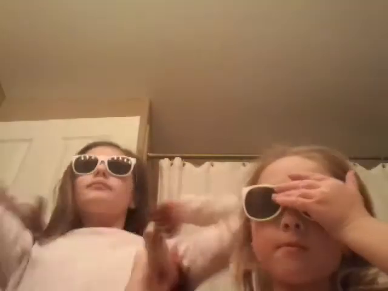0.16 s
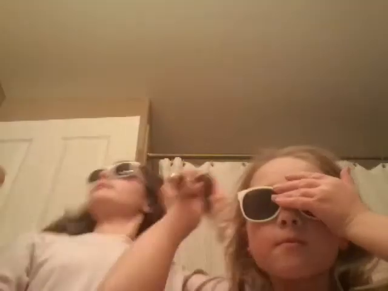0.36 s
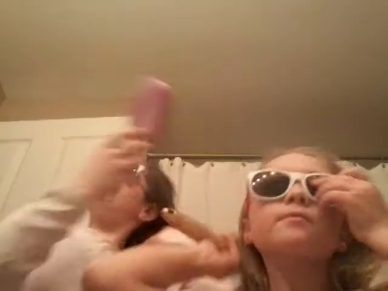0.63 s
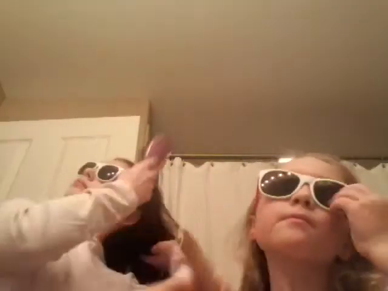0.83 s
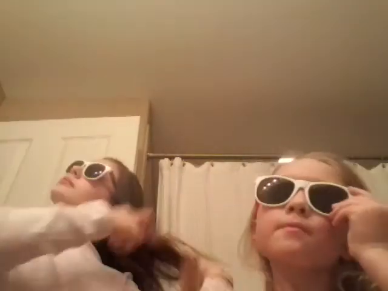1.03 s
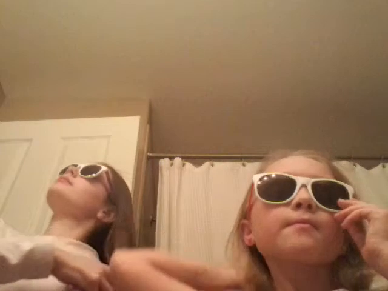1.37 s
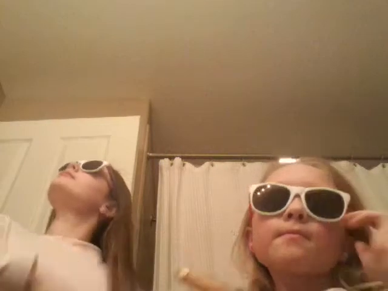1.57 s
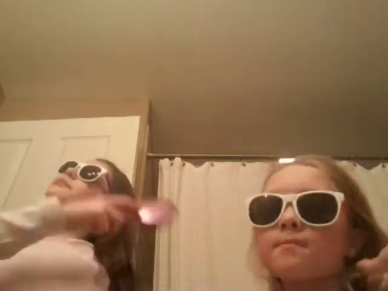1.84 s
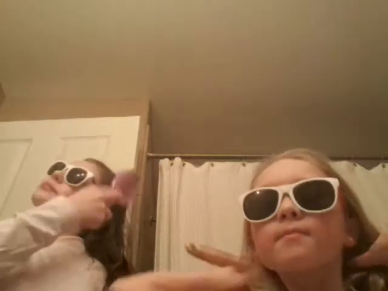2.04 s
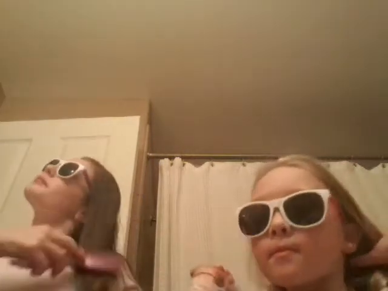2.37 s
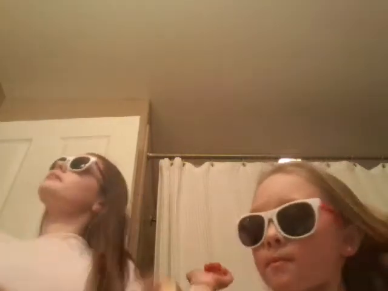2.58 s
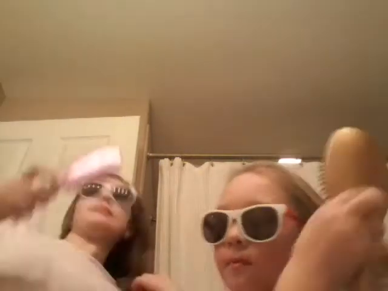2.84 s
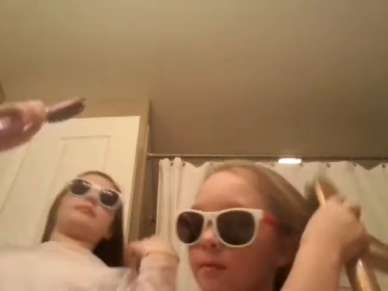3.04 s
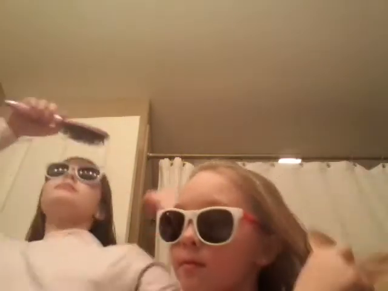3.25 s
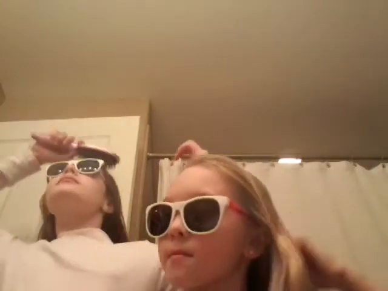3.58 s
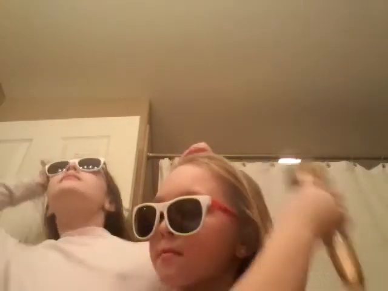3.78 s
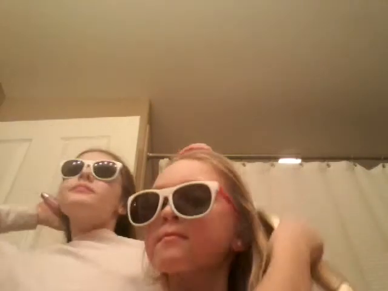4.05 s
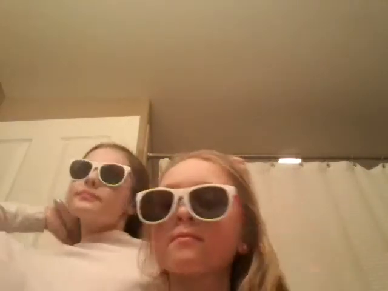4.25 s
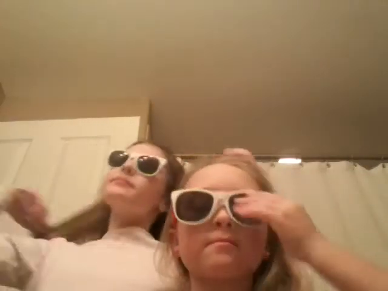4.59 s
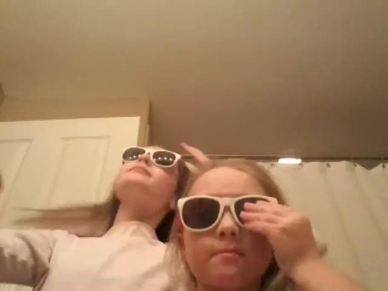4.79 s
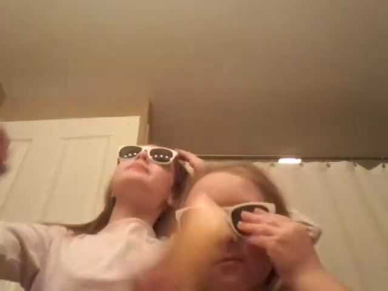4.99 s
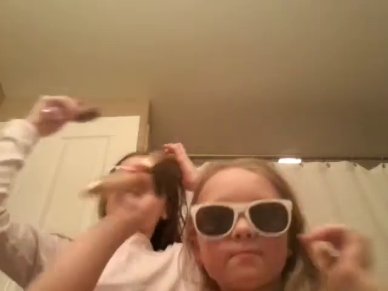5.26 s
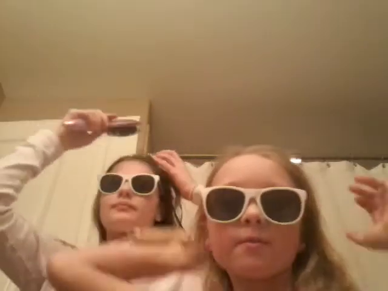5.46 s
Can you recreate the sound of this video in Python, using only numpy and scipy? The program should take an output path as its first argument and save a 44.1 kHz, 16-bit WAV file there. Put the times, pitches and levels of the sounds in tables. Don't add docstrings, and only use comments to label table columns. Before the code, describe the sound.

A small tiled bathroom heard through a little microphone close to the action, with a faint, slightly unsteady extractor fan hum and air noise throughout. At 0 s a dull, low thump shakes the counter and fades in under half a second. Brush strokes follow, hissing through hair from about 0.15 s, with a cluster of strong scratchy catches and plastic ticks at 0.6 to 0.75 s. Sleeves and skin rub, and soft bumps come around 1 s and again at 1.6 s. At 1.76 s the brush snaps on a hard edge: very loud, bright, with quick wall echoes and a short tail. Gentler strokes resume from 2 s, with a snaggy rustle at 2.5 s, then lighter brushing and rubbing from 3.4 to 4.2 s. At 4.32 s a harder, booming thump makes the counter ring and beat. A brief stroke at 4.6 s, then near quiet with faint brushing until about 5.6 s.

```python
import sys
import numpy as np
from scipy import signal
from scipy.fft import rfft, irfft, next_fast_len
from scipy.io import wavfile
from scipy.ndimage import uniform_filter1d

SR = 44100
rng = np.random.default_rng(int(sys.argv[2]) if len(sys.argv) > 2 else 0)


def unload_wav(signal):
    wavfile.write(
        sys.argv[1],
        SR,
        np.round(np.clip(np.atleast_2d(signal).T, -1, 1) * 32767).astype(np.int16),
    )


def convert_level_to_amplitude(level_db):
    exponent = np.asarray(level_db, float) / 20
    return 10 ** exponent


N = 248711
TIME = np.arange(N) / SR
COARSE_TIME = TIME[::32]
EDGES = 25 * 2 ** np.arange(0, 9.9, 1 / 5)
SNAP_S = 1.7633


def rms_one(x):
    return x / np.sqrt(np.mean(x ** 2) + 1e-20)


def peak_one(x):
    return x / np.abs(x).max()


def at_hz(points, hz):
    points = np.array(points)
    return np.interp(np.log(hz), np.log(points[:, 0]), points[:, 1])


def drift(rate):
    r = np.exp(-80 * np.pi * rate / SR)
    white = rng.standard_normal(N // 40 + 2002)
    slow = rms_one(signal.lfilter([1], [1, -2 * r, r * r], white)[2000:])
    return np.interp(np.arange(N) / 40, np.arange(len(slow)), slow)


def coloured(x, spectrum):
    size = next_fast_len(len(x))
    hz = np.maximum(np.fft.rfftfreq(size, 1 / SR), 1)
    return rms_one(irfft(rfft(x, size) * convert_level_to_amplitude(at_hz(spectrum, hz)), size)[:len(x)])


def ring(x, hz, t60):
    r, w = convert_level_to_amplitude(-60 / (max(t60, .001) * SR)), 2 * np.pi * hz / SR
    return signal.lfilter([0, np.sin(w)], [1, -2 * r * np.cos(w), r * r], x + 1e-18)


def grains(per_s, spread_db):
    sizes = convert_level_to_amplitude(spread_db * np.minimum(rng.exponential(1, N), 5)) * rng.choice([-1, 1], N)
    return sizes * (rng.random(N) < per_s / SR)


def place(sound, s):
    at = round(s * SR)
    return np.pad(sound[max(-at, 0):], (max(at, 0), N))[:N]


def swells(start, length, rise_db_per_s, fall_db_per_s):
    early = np.maximum(start[:, None] - COARSE_TIME, 0)
    late = np.maximum(COARSE_TIME - (start + length)[:, None], 0)
    return convert_level_to_amplitude(-2 * np.minimum(rise_db_per_s * early + fall_db_per_s * late, 300))


def gain(shapes, db):
    return np.interp(TIME, COARSE_TIME, np.sqrt(convert_level_to_amplitude(2 * db) @ shapes))


def pitch(shapes, db, hz):
    weight = convert_level_to_amplitude(2 * db)
    return np.interp(TIME, COARSE_TIME, (weight * hz) @ shapes / (weight @ shapes))


def gliding(x, hz, width_hz):
    turn = np.exp(2j * np.pi * np.cumsum(hz) / SR)
    r = np.exp(-np.pi * width_hz / SR)
    smooth = signal.lfilter([1], [1, -2 * r, r * r], x / turn)
    return rms_one((smooth * turn).real)


def dying(white, colour, t60s, hold, low_hz, high_hz):
    t = np.arange(len(white)) / SR
    spectrum, hz = rfft(coloured(white, colour)), np.fft.rfftfreq(len(t), 1 / SR)
    out = np.zeros(len(t))
    for low, high in zip(EDGES, EDGES[1:]):
        inside = (hz >= max(low, low_hz)) & (hz < min(high, high_hz))
        band = irfft(spectrum * inside, len(t))
        out += band * convert_level_to_amplitude(-60 * np.maximum(t - hold, 0) / at_hz(t60s, low))
    return out / np.sqrt(np.mean(out[:round(.05 * SR)] ** 2))


def blow(s, level_db, rise_s, hold_s, shut_s, colour, t60s, low_hz, echoes=(), echo_db=6.0):
    t = np.arange(2 ** 15) / SR
    white = rng.standard_normal(len(t))
    bright = signal.sosfilt(signal.butter(2, 2500, "high", fs=SR, output="sos"), white)
    for delay, db in echoes:
        flare_db = -60 * np.abs(t - delay) / np.where(t < delay, .005, .012)
        white = white + bright * convert_level_to_amplitude(db + echo_db + flare_db)
    tail = dying(white, colour, t60s, hold_s, low_hz, SR / 2)
    gate_db = -10.0 * np.clip((t + s - shut_s) / .08 + 1, 0, 1)
    return place(tail * np.clip(t / rise_s, 0, 1) * convert_level_to_amplitude(level_db + gate_db), s)


def shake(level, colour, t60s, modes, mode_db, in_step=False):
    t = np.arange(2 ** 15) / SR
    out = dying(rng.standard_normal(len(t)), colour, t60s, 0, 30, 700)
    for k, (hz, db, t60) in enumerate(modes):
        start = rng.random()
        if in_step:
            start = k / 2
        out += convert_level_to_amplitude(db + mode_db - 60 * t / t60) * np.sin(2 * np.pi * (hz * t + start))
    out /= np.sqrt(uniform_filter1d(out ** 2, size=1800) + 1e-12)
    s, db = np.transpose(level)
    db = np.interp(t + s[0], s, db) - 300 * np.maximum(t + s[0] - s[-1], 0)
    return place(out * convert_level_to_amplitude(db) * np.clip(t / .0015, 0, 1), s[0] - .0015)


def fan():
    # time in seconds, background level in dB.
    fan_level = [(0, -56.5), (.5, -58), (.8, -59.5), (1.7, -59), (2.2, -60.5), (3.0, -61), (4.3, -61),
                 (4.34, -53), (4.64, -56), (4.8, -62.5), (5.64, -63)]
    # pitch in Hz, level in dB per Hz.
    air_colour = [(20, -8), (45, -16), (80, -9), (130, -7), (200, -10), (330, -13.5), (480, -9.5),
                  (600, -11), (800, -12), (1000, -15), (2300, -16.5), (3600, -15.5), (6000, -16.5),
                  (8500, -21.5), (15400, -23)]
    # pitch in Hz, level in dB over the background.
    hum_tones = [
        (120, -7.5),
        (240, -24),
    ]
    sound = coloured(rng.standard_normal(N), air_colour) * convert_level_to_amplitude(-3)
    for hz, db in hum_tones:
        strength = convert_level_to_amplitude(db + 2.5 * drift(9)) * np.sqrt(2)
        sound += strength * np.sin(2 * np.pi * hz * TIME + .45 * drift(8))
    return sound * convert_level_to_amplitude(np.interp(TIME, *np.transpose(fan_level)))


def first_thump():
    # pitch in Hz, level in dB per Hz.
    colour = [(24, -66), (40, -40), (85, -33), (105, -10), (123, -3), (174, -17), (230, -9), (290, -6),
              (390, -7), (560, -13), (700, -28), (2910, -44), (5800, -35.5), (8500, -54), (15400, -70)]
    # pitch in Hz, seconds to fall 60 dB.
    t60s = [(40, .9), (100, .55), (250, .42), (500, .3), (750, .5), (2000, .38), (6000, .32), (12000, .22)]
    # pitch in Hz, level in dB, seconds to fall 60 dB.
    modes = [(123, 1, .45), (128, -10, .6), (208, -10, .5), (255, -10, .35), (285, -7, .25),
             (310, -14, .45), (388, -9, .35), (410, -14, .35), (468, -16, .42), (528, -19, .33),
             (562, -12, .18), (660, -28, .4), (745, -22, .25), (820, -30, .45)]
    # time in seconds, level in dB.
    level = [(0.0, -15), (0.08, -16), (0.108, -19), (0.162, -32), (0.328, -44), (0.4, -58)]
    bright = blow(s=-.01, level_db=-30.5, rise_s=.004, hold_s=.03, shut_s=.5,
                  colour=colour, t60s=t60s, low_hz=700)
    return bright + shake(level, colour, t60s, modes, mode_db=7.0)


def strands(shapes, hiss_db, whistle_db, hz, width_hz, colour):
    hiss = coloured(grains(7000 * convert_level_to_amplitude(3.0 * drift(30)), spread_db=3.0), colour)
    sing = gliding(grains(4000, spread_db=2.5), pitch(shapes, whistle_db, hz), width_hz)
    return hiss * gain(shapes, hiss_db - 1.5) + sing * gain(shapes, whistle_db - 2.5)


def hair():
    # pitch in Hz, level in dB per Hz.
    hair_colour = [(1200, -24), (2000, -11), (3050, -9), (4300, -8), (5640, 0), (6550, -2), (8910, -14),
                   (15400, -22)]
    # start in seconds, length in seconds, hair hiss in dB,
    # bristle whistle in dB, whistle pitch in Hz.
    stroke_table = [(.15, .03, -53, -62, 2420), (.19, .13, -54, -57, 2300), (.39, .14, -55, -58, 2350),
                    (.585, .13, -49.5, -55, 2780), (.91, .06, -59, -66, 2430), (1.02, .13, -60, -74, 2520),
                    (1.3, .18, -61, -76, 2520), (1.52, .06, -62, -66, 2400), (1.585, .12, -52, -62, 2300),
                    (1.95, .14, -57, -72, 2620), (2.16, .16, -61, -76, 2650), (2.385, .26, -55, -59, 2380),
                    (2.8, .03, -63, -76, 2400), (2.87, .27, -62, -66, 2330), (3.4, .06, -59, -64, 2950),
                    (3.52, .06, -65, -78, 2600), (3.64, .05, -66, -65, 2700), (3.66, .31, -63, -72, 2700),
                    (4.1, .04, -64, -64, 2400), (4.17, .11, -59, -62, 2450), (4.57, .065, -55, -57, 2330),
                    (5.13, .11, -67, -82, 2700), (5.62, .03, -68, -74, 2310)]
    # time in seconds, hair hiss in dB, bristle whistle in dB,
    # whistle pitch in Hz.
    snag_table = [(.262, -51, -58, 2360), (.442, -52, -57, 2310), (.648, -43, -46, 2830),
                  (.668, -48, -48, 2830), (.692, -42, -41, 2800), (.948, -55, -60, 1700),
                  (1.588, -42, -49, 2320), (1.655, -45, -58, 2290), (1.69, -52, -62, 2300),
                  (2.075, -54, -66, 2620), (2.155, -57, -68, 2640), (2.51, -51, -51, 2450),
                  (2.54, -51, -53, 3400), (3.24, -56, -62, 2000), (3.395, -51, -52, 2930),
                  (3.455, -63, -62, 1900), (3.913, -59, -70, 2590), (4.15, -49, -48, 2810),
                  (4.163, -49, -54, 3800), (4.625, -53, -56, 3000), (4.984, -70, -72, 2520),
                  (5.228, -62, -80, 2600), (4.59, -55, -54, 3000), (2.938, -59, -72, 2400),
                  (2.3, -58, -72, 2400)]
    s, length, *stroke = np.transpose(stroke_table)
    at, *snag = np.transpose(snag_table)
    stroke_shapes = swells(s, length, rise_db_per_s=300, fall_db_per_s=230)
    snag_shapes = swells(at, 0, rise_db_per_s=1600, fall_db_per_s=400)
    return (strands(stroke_shapes, *stroke, width_hz=520, colour=hair_colour)
            + strands(snag_shapes, *snag, width_hz=560, colour=hair_colour))


def ticks():
    # time in seconds, peak in dB, body pitch in Hz.
    tick_table = [(0.1531, -37, 5250), (0.407, -43, 5280), (0.4464, -35, 5140), (0.5781, -35, 2790),
                  (0.616, -35, 2770), (0.6456, -22.5, 6160), (0.6652, -26, 2850), (0.6913, -19, 2780),
                  (0.7114, -32, 2910), (0.7324, -33, 2660), (0.9163, -43, 5690), (0.9467, -35, 4400),
                  (1.5838, -29, 5490), (1.6521, -33, 5930), (1.9914, -34, 5440), (2.0408, -42, 6390),
                  (2.0587, -38.5, 5430), (2.151, -39, 7080), (2.3675, -42, 6130), (2.5087, -32, 1870),
                  (2.5344, -33, 1440), (2.6094, -39, 6780), (2.8025, -46, 5790), (3.0994, -45, 5380),
                  (3.2395, -46.5, 6090), (3.3872, -38.5, 2970), (3.9135, -45, 5980), (4.1485, -33, 2870),
                  (4.1624, -33, 2750), (5.1342, -50, 6180), (.596, -41, 3000), (.6465, -29, 2900),
                  (.6725, -30, 2800), (.673, -33, 6000), (.6925, -28, 6500), (.7305, -34, 6200),
                  (.93, -45, 1000), (.9465, -38, 1600), (1.5905, -32, 5600), (1.596, -34, 1900),
                  (1.662, -35, 5600), (1.686, -39, 6000), (2.494, -45, 2350), (2.538, -42, 4000),
                  (2.51, -41, 3900), (.701, -32, 2700), (.605, -40, 3000), (.6025, -41, 6800),
                  (.629, -40, 6500), (.655, -38, 6000), (2.517, -34, 1900), (2.505, -37, 1600),
                  (2.54, -38, 3200), (3.396, -40, 6500), (3.397, -42, 3000), (4.142, -39, 2800),
                  (4.1495, -34, 5700), (4.154, -39, 6200), (4.1595, -35, 5900), (4.1635, -37, 6300),
                  (4.172, -42, 5900), (2.047, -45, 5800), (2.068, -44, 6500), (2.078, -45, 5600),
                  (2.086, -46, 7000)]
    rise_s, fade_s = .0008, .012
    out, size = np.zeros(N), 2000
    t = np.arange(size) / SR
    crack = signal.butter(2, [4200, 11000], "band", fs=SR, output="sos")
    for s, db, hz in tick_table:
        burst = rng.standard_normal(size) * convert_level_to_amplitude(-60 * t / fade_s) * np.clip(t / rise_s, 0, 1)
        body = ring(ring(burst, hz, 16.0 / hz), hz, 9.0 / hz)
        bright = signal.sosfilt(crack, burst)
        crack_db = -10 + 2.5 * np.log2(hz / 4000)
        tick = convert_level_to_amplitude(-2.5) * peak_one(body) + convert_level_to_amplitude(crack_db) * peak_one(bright)
        out += place(convert_level_to_amplitude(db) * tick, s)
    return out


def sleeves():
    # peak time in seconds, rub in dB, rustle in dB, rub pitch in Hz.
    rub_table = [(1.41, -56, -63, 480), (.52, -60, -65, 250), (.6, -56, -58, 366), (.69, -48, -51, 330),
                 (.975, -53, -55, 374), (1.035, -49, -64, 246), (1.25, -57, -65, 350),
                 (1.338, -58, -63, 600), (1.55, -52, -60, 400), (1.618, -42, -43, 450),
                 (1.684, -46, -54, 316), (2.04, -56, -65, 363), (2.2, -62, -69, 380), (2.32, -61, -70, 478),
                 (2.42, -58, -67, 462), (2.535, -43, -46, 500), (2.76, -64, -78, 230), (2.9, -63, -71, 460),
                 (2.6, -56, -61, 460), (3.05, -66, -73, 480), (3.42, -57, -62, 457), (3.55, -60, -68, 432),
                 (3.68, -60, -65, 400), (3.77, -60, -64, 432), (3.86, -61, -65, 426), (4.0, -67, -78, 219),
                 (4.17, -63, -62, 367), (4.26, -59, -69, 354), (5.45, -66, -72, 225),
                 (5.604, -68, -78, 309)]
    # pitch in Hz, level in dB per Hz.
    rub_colour = [(40, -26), (75, -13), (140, -13), (190, -4), (260, -4), (325, -14), (400, -4), (480, -7),
                  (570, -1), (700, -10), (1000, -20), (4000, -50)]
    # pitch in Hz, level in dB per Hz.
    rustle_colour = [(400, -25), (750, -2), (1200, -1), (1900, -3), (2600, -9), (4000, -16), (9000, -35)]
    hold_s = .03
    s, rub_db, rustle_db, hz = np.transpose(rub_table)
    moves = swells(s - hold_s / 2, hold_s, rise_db_per_s=260, fall_db_per_s=190)
    start_s, end_s, rest_rub_db, rest_rustle_db = .3, 2.7, -65, -72
    restless = np.clip(np.minimum(TIME - start_s, end_s - TIME) / .05, 0, 1) * convert_level_to_amplitude(1.5 * drift(3))
    folds = grains(3000 * convert_level_to_amplitude(2.5 * drift(20)), spread_db=2.2)
    moving_tone = gliding(folds, pitch(moves, rub_db, hz), width_hz=240)
    rub = .85 * coloured(folds, rub_colour) + .55 * moving_tone
    rustle = coloured(grains(4000, spread_db=2.5), rustle_colour)
    rub_gain = np.hypot(gain(moves, rub_db - 2.5), restless * convert_level_to_amplitude(rest_rub_db))
    rustle_gain = np.hypot(gain(moves, rustle_db - 1.5), restless * convert_level_to_amplitude(rest_rustle_db))
    return rub * rub_gain + rustle * rustle_gain


def bumps():
    # time in seconds, peak in dB, pitch in Hz.
    bump_table = [(0.647, -41, 269), (0.947, -35, 400), (1.01, -35, 388), (1.02, -34, 242),
                  (1.072, -37, 223), (1.3065, -41, 540), (1.535, -43, 487), (1.613, -28, 581),
                  (1.66, -33, 270), (2.037, -44, 428), (2.503, -37, 576), (3.394, -46, 433),
                  (3.429, -48, 450), (1.26, -47, 182), (1.9, -44, 72), (2.04, -38, 62), (2.74, -50, 240),
                  (3.98, -50, 180), (4.14, -48, 180), (.962, -40, 260), (1.022, -41, 560),
                  (1.085, -42, 400), (1.545, -42, 250), (1.29, -48, 185), (.87, -49, 260),
                  (1.335, -44, 520), (1.371, -44, 520), (1.39, -50, 400), (1.511, -44, 474),
                  (1.565, -38, 620), (1.589, -32, 393), (1.632, -35, 230), (1.655, -35, 390),
                  (1.692, -40, 240), (2.399, -47, 366), (2.518, -38, 560), (2.53, -36, 480),
                  (2.55, -41, 550), (3.525, -48, 430), (3.665, -48, 440), (3.76, -47, 450),
                  (3.875, -49, 450)]
    cycles = 30.0
    out, push = np.zeros(N), np.pad(np.hanning(40) / 20, (0, 15000))
    rumble_cut = signal.butter(2, 150, "high", fs=SR, output="sos")
    for s, db, hz in bump_table:
        wobble = ring(push, hz, min(cycles / hz, .16))
        wobble += .45 * ring(push, hz * 1.5, min(.6 * cycles / hz, .1))
        out += place(convert_level_to_amplitude(db - 3) * wobble, s)
    return signal.sosfilt(rumble_cut, out)


def bathroom(x):
    t60_s, room_db = .2, -8.5
    t = np.arange(SR // 3) / SR
    tail = rng.standard_normal(len(t)) * convert_level_to_amplitude(-60 * t / t60_s) * np.clip(t / .006, 0, 1)
    tail /= np.sqrt(np.sum(tail ** 2))
    return x + convert_level_to_amplitude(room_db) * signal.fftconvolve(x, tail)[:N]


def snap_tail():
    # pitch in Hz, level in dB per Hz.
    colour = [(60, -38), (253, -19), (343, -26), (612, -9), (860, -20), (1040, -11), (1250, -17),
              (1380, -32), (1550, -18), (1960, -15), (3830, -11.5), (5200, -5.5), (6150, -1), (6900, -8),
              (8060, -17.5), (15400, -40)]
    # pitch in Hz, seconds to fall 60 dB.
    t60s = [(80, .3), (300, .45), (800, .43), (2000, .39), (6000, .3), (12000, .23)]
    # delay in seconds, level in dB.
    echoes = [
        (.0012, -1),
        (.0068, 0),
        (.0102, 2.5),
        (.0147, -3),
        (.037, -5),
    ]
    return blow(s=SNAP_S, level_db=-18.5, rise_s=.0007, hold_s=.022, shut_s=1.95,
                colour=colour, t60s=t60s, low_hz=200, echoes=echoes, echo_db=-1.5)


def snap_rings():
    # time in seconds, peak in dB, pitch in Hz.
    arrivals = [
        (1.7638, -7, 6200),
        (1.77, -7, 6200),
        (1.7732, -5, 6250),
        (1.7746, -12, 5700),
        (1.7778, -11, 5850),
        (1.7875, -18, 6400),
    ]
    t60_s = .0042
    out, click = np.zeros(N), np.pad([1.], (0, 999))
    for s, db, hz in arrivals:
        flare = ring(ring(click, hz, t60_s), hz, t60_s)
        out += place(convert_level_to_amplitude(db) * peak_one(flare), s)
    return out


def snap_body():
    # time in seconds, peak in dB, pitch in Hz.
    knocks = [
        (1.7634, -20, 650),
        (1.7634, -16, 2650),
        (1.7695, -25, 700),
        (1.7705, -22, 2800),
        (1.7725, -23, 1800),
        (1.7768, -28, 850),
        (1.7775, -22, 3500),
        (1.7975, -28, 700),
    ]
    # pitch in Hz, level in dB, seconds to fall 60 dB.
    modes = [(490, -45, .3), (630, -38, .28), (1028, -39, .3), (1744, -38, .18), (1981, -44, .3),
             (2180, -37, .17)]
    cycles = 5.0
    out, click = np.zeros(N), np.pad([1.], (0, 19999))
    for s, db, hz in knocks:
        knock = ring(ring(click[:2000], hz, cycles / hz), hz, cycles / hz)
        out += place(convert_level_to_amplitude(db) * peak_one(knock), s)
    for hz, db, t60 in modes:
        out += place(convert_level_to_amplitude(db) * ring(click, hz, t60), SNAP_S)
    return signal.sosfilt(signal.butter(4, 480, "high", fs=SR, output="sos"), out)


def drags():
    # start in seconds, length in seconds, level in dB, pitch in Hz.
    drag_table = [(2.4, .06, -69, 2300), (2.57, .08, -69, 2400), (2.98, .15, -68, 2225),
                  (4.19, .1, -66, 2230), (3.4, .05, -60, 460), (3.53, .05, -60, 430), (3.66, .04, -60, 440),
                  (3.75, .05, -60, 450), (3.83, .07, -62, 450), (3.68, .24, -71, 1120),
                  (3.42, .04, -68, 1050), (3.66, .04, -61, 230), (2.89, .03, -65, 600),
                  (4.17, .04, -64, 600), (3.7, .1, -69, 780)]
    s, length, db, hz = np.transpose(drag_table)
    shapes = swells(s, length, rise_db_per_s=500, fall_db_per_s=450)
    friction = grains(5000, spread_db=2.0)
    out = np.zeros(N)
    for k, f in enumerate(hz):
        t60 = np.clip(10.0 / f, .012, .03)
        song = rms_one(ring(ring(friction, f, t60), f, t60))
        out += song * gain(shapes[k:k + 1], db[k:k + 1])
    return out


def second_thump():
    # pitch in Hz, level in dB per Hz.
    colour = [(24, -49), (60, -28), (130, -10), (190, -2), (266, -5), (377, -1), (576, -6), (703, -17),
              (996, -24), (2100, -23.5), (4330, -32), (5700, -24), (9000, -47), (15400, -64)]
    # pitch in Hz, seconds to fall 60 dB.
    t60s = [(40, .9), (100, .65), (250, .5), (500, .37), (750, .5), (2000, .42), (4600, .37), (6400, .31),
            (9000, .27)]
    # delay in seconds, level in dB.
    echoes = [
        (.007, 2),
        (.0105, -2),
        (.0155, -1),
    ]
    # pitch in Hz, level in dB, seconds to fall 60 dB.
    modes = [(95, -18, .6), (129, -7, .42), (136, -8, .42), (194, 2, .3), (201, -9, .35), (240, -12, .45),
             (262, -11, .5), (307, -4, .4), (318, -11, .35), (374, -3, .38), (389, -6, .33),
             (470, -10, .36), (490, -6, .33), (560, -3, .26), (584, -4, .25), (678, -24, .4),
             (775, -18, .3), (800, -21, .3)]
    # time in seconds, level in dB.
    level = [(4.3215, -16), (4.341, -13), (4.397, -15), (4.65, -50), (4.777, -64), (4.82, -79)]
    # pitch in Hz, level in dB per Hz.
    edge_colour = [(3000, -14), (7000, -3), (10500, 0), (12500, -6), (14500, -3), (15400, -9), (15900, -45)]
    # pitch in Hz, seconds to fall 60 dB.
    edge_t60s = [(5000, .03), (12000, .016)]
    bright = blow(s=4.3197, level_db=-22, rise_s=.006, hold_s=.016, shut_s=4.77,
                  colour=colour, t60s=t60s, low_hz=700, echoes=echoes, echo_db=4.0)
    counter = shake(level, colour, t60s, modes, mode_db=8.0, in_step=True)
    edge = blow(s=4.3245, level_db=-47, rise_s=.001, hold_s=.003, shut_s=4.5,
                colour=edge_colour, t60s=edge_t60s, low_hz=3000)
    return bright + counter + edge


def scene():
    blows = first_thump() + snap_tail() + snap_rings() + snap_body() + second_thump()
    brushing = hair() + bathroom(ticks() + bumps()) + drags()
    return (fan() + blows + brushing + sleeves())[None]


def band_limit(x):
    return signal.sosfilt(signal.butter(12, 15600, fs=SR, output="sos"), x)


def record(dry):
    return band_limit(.95 * np.tanh(dry / .95))


dry = scene()
out = record(dry)
unload_wav(out)
```